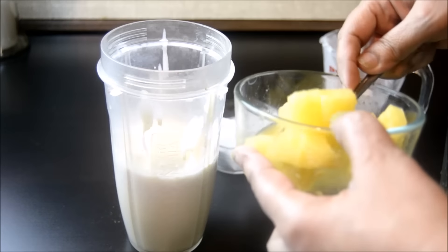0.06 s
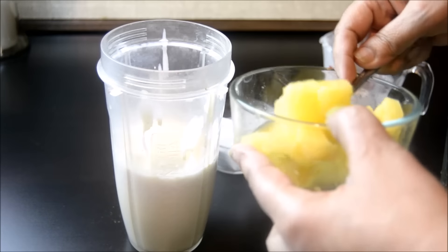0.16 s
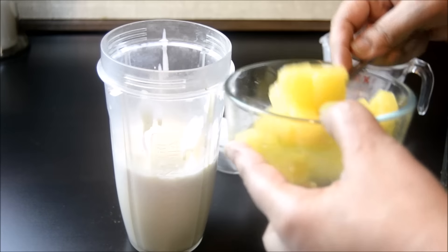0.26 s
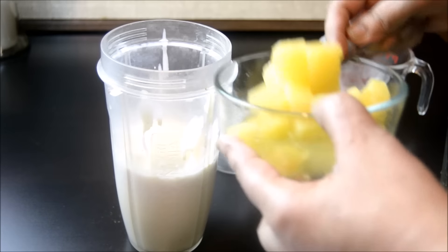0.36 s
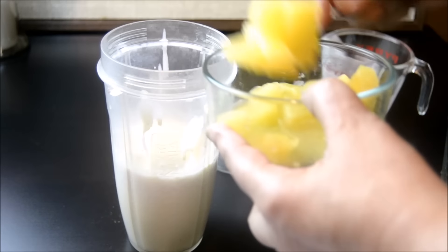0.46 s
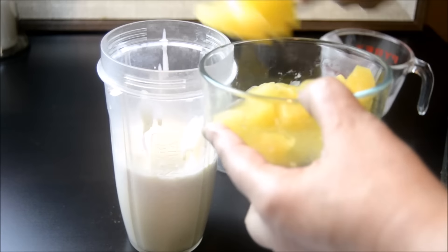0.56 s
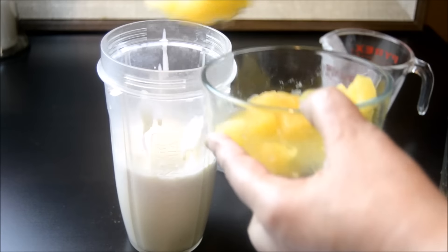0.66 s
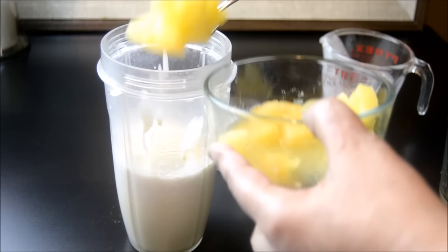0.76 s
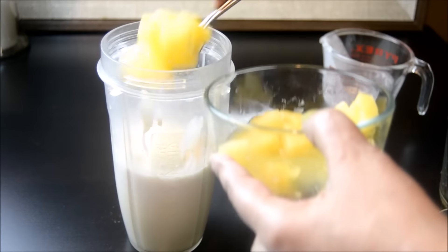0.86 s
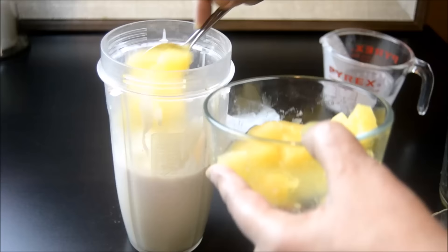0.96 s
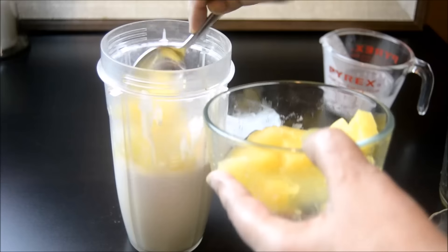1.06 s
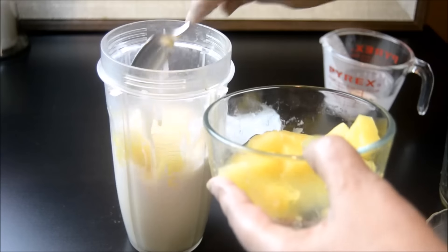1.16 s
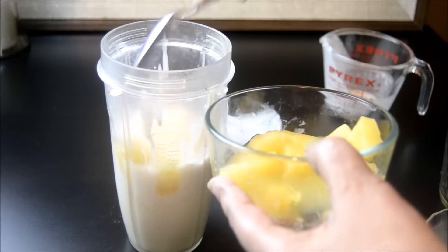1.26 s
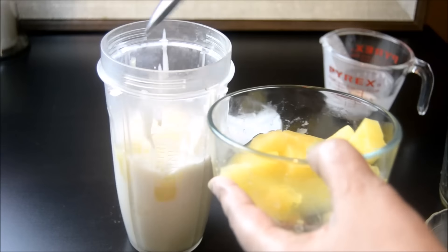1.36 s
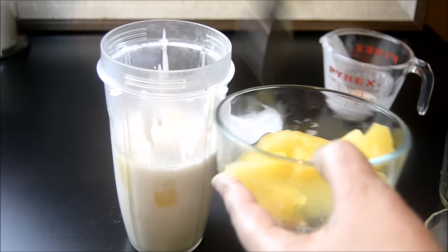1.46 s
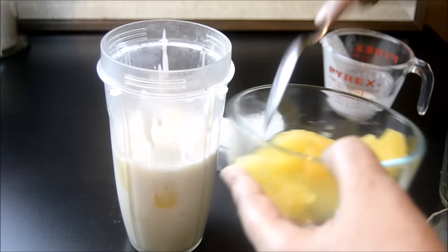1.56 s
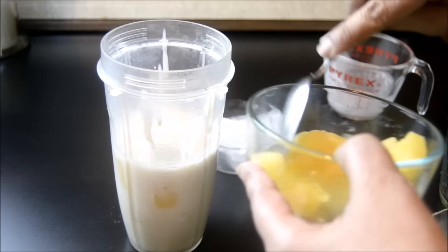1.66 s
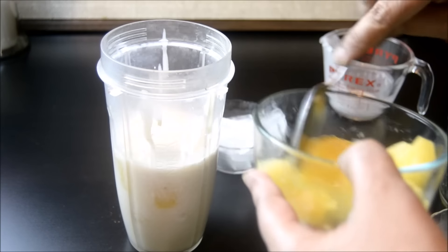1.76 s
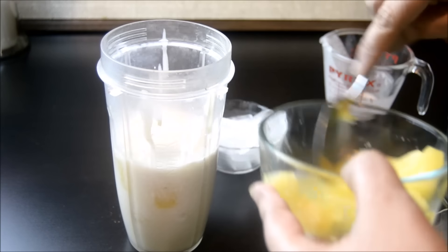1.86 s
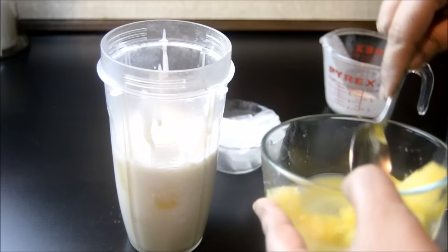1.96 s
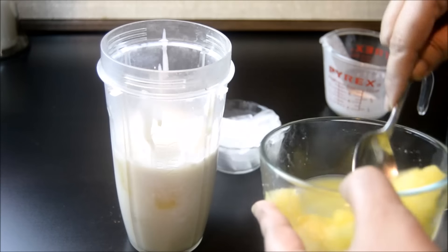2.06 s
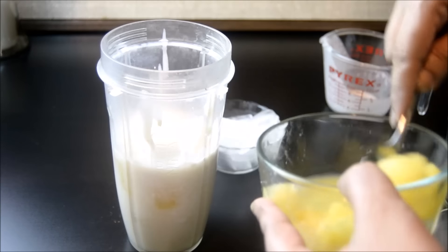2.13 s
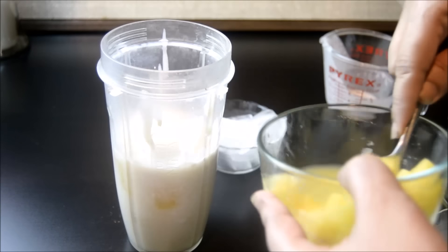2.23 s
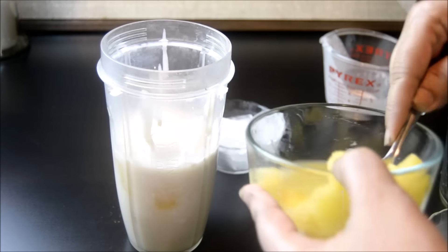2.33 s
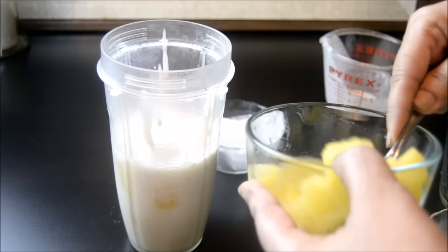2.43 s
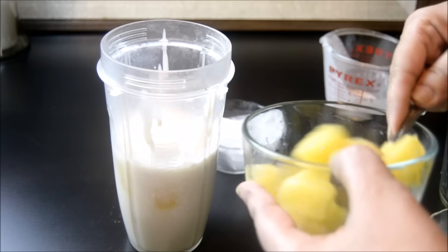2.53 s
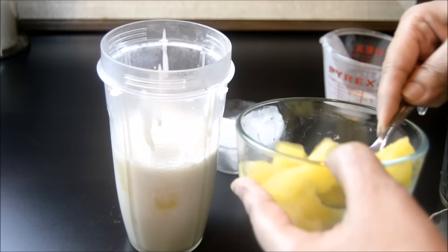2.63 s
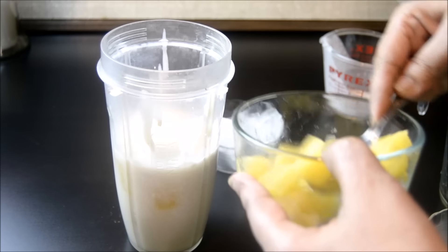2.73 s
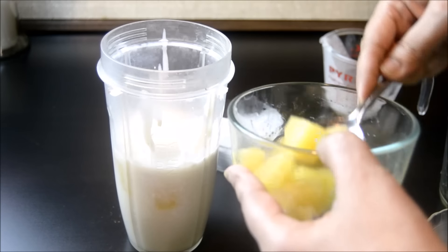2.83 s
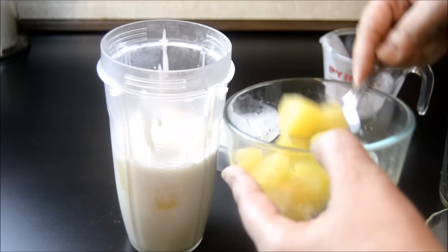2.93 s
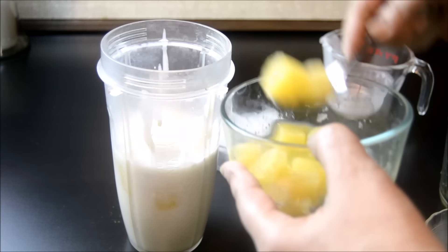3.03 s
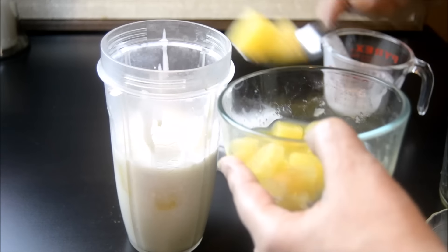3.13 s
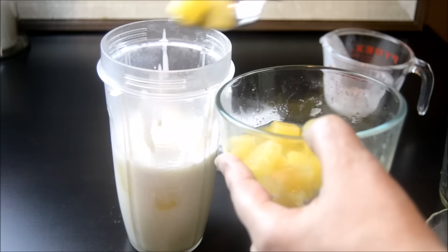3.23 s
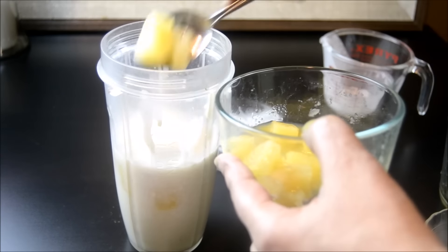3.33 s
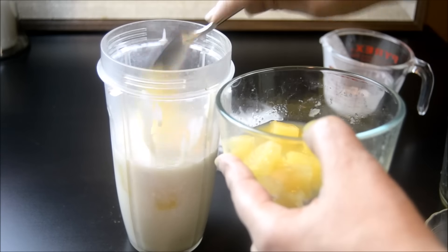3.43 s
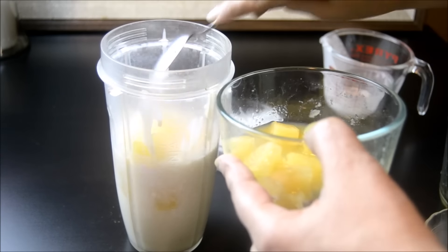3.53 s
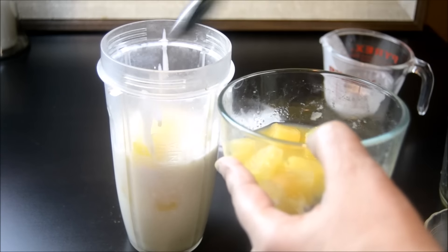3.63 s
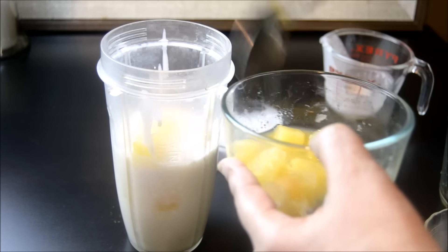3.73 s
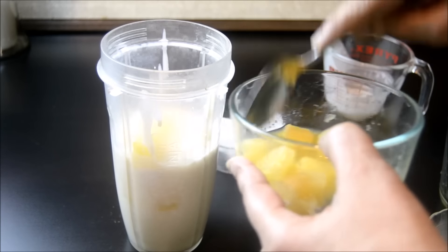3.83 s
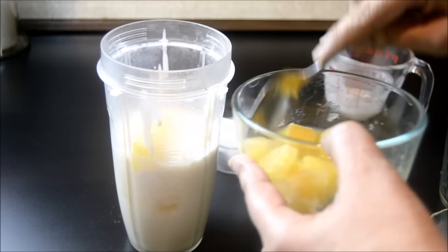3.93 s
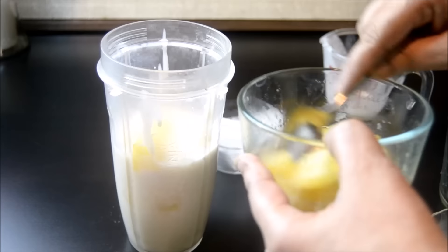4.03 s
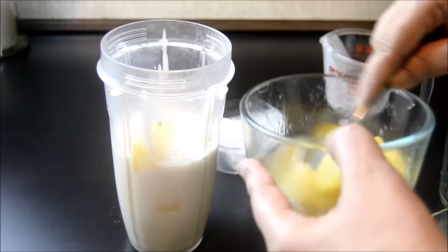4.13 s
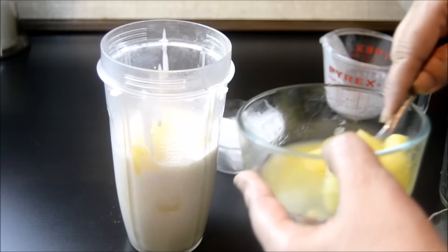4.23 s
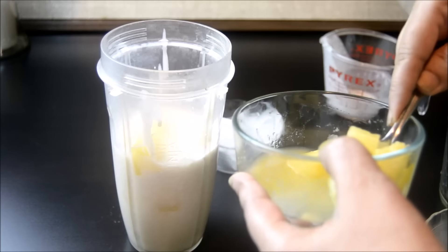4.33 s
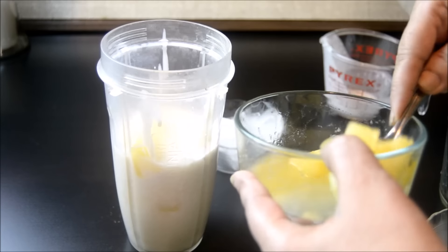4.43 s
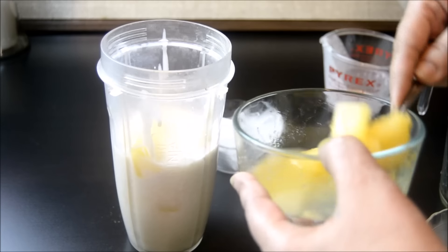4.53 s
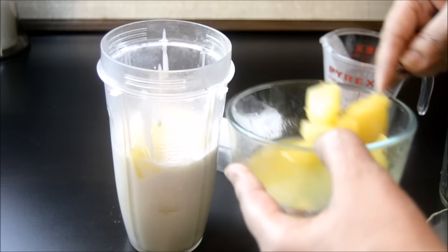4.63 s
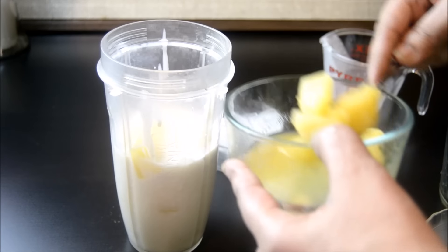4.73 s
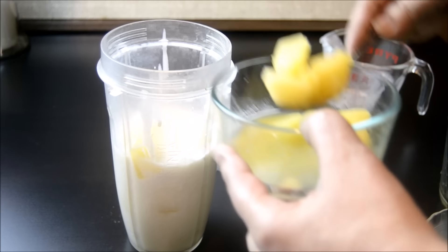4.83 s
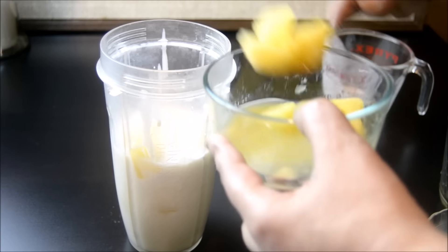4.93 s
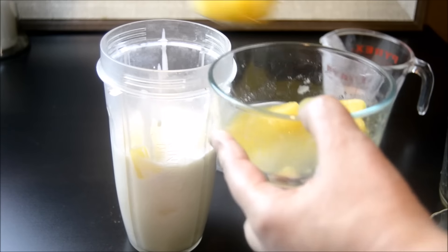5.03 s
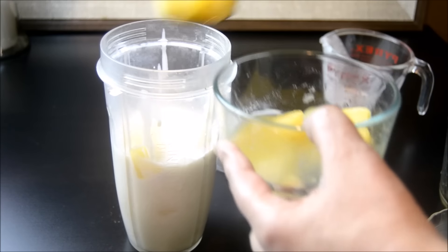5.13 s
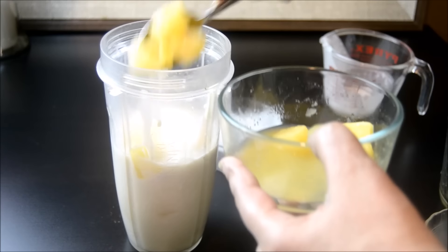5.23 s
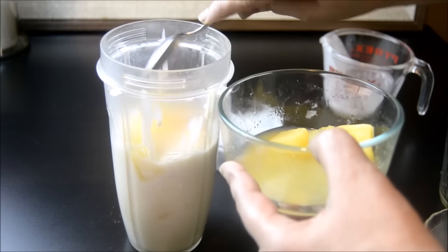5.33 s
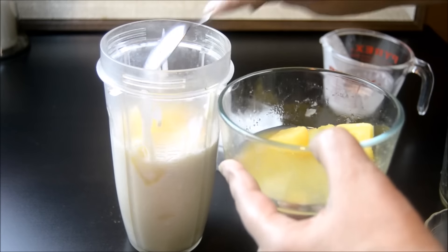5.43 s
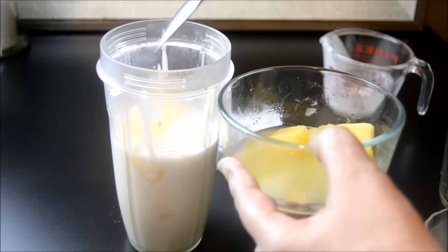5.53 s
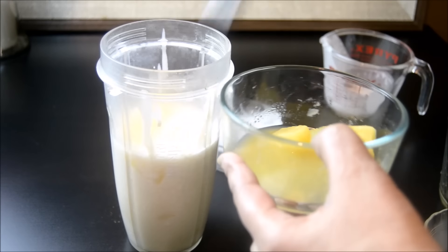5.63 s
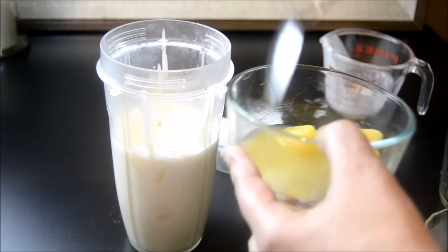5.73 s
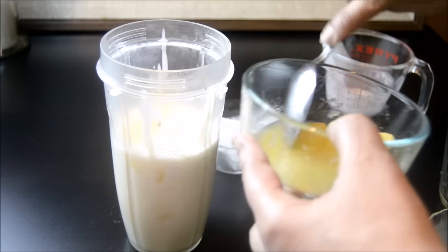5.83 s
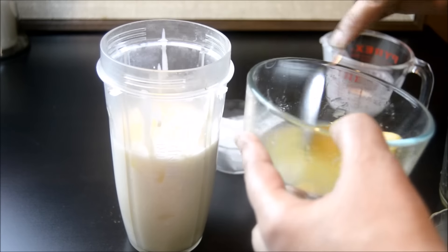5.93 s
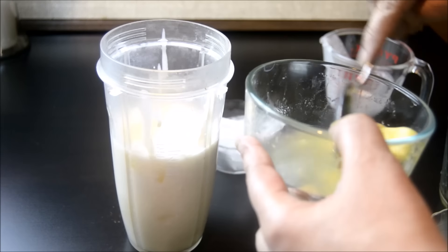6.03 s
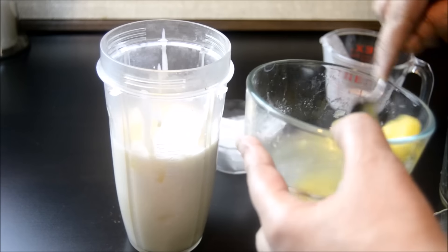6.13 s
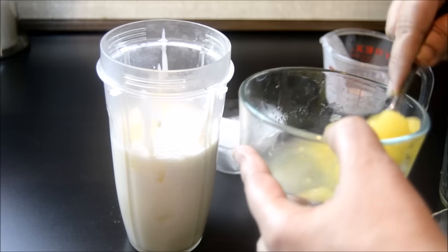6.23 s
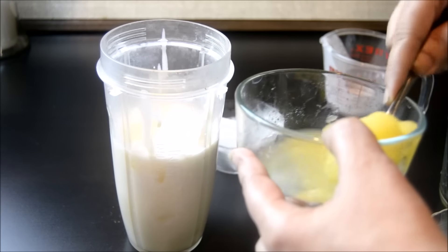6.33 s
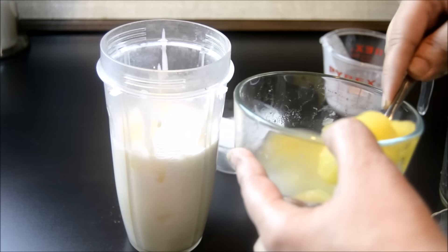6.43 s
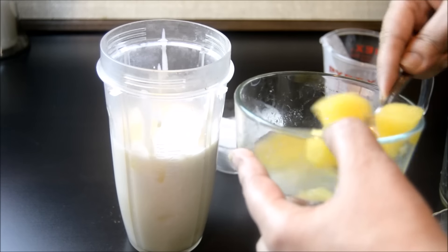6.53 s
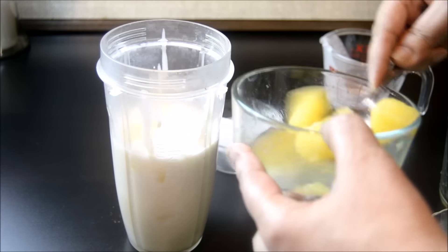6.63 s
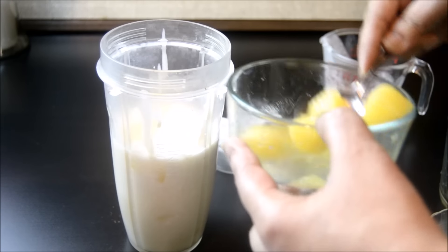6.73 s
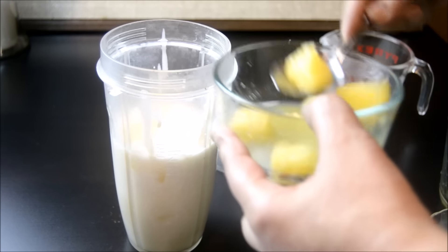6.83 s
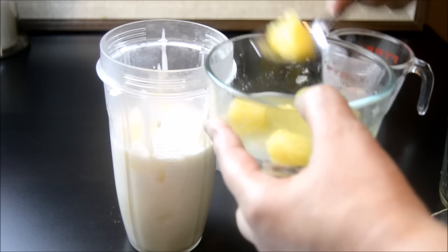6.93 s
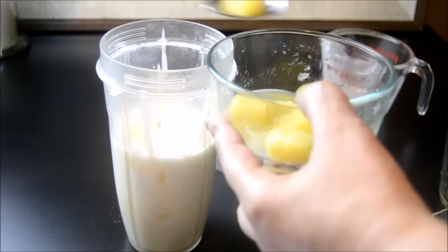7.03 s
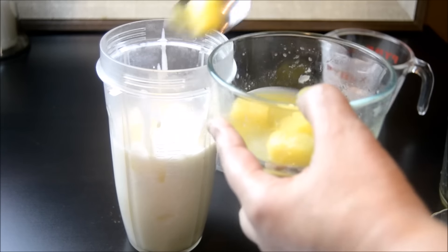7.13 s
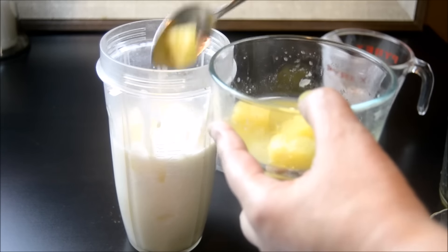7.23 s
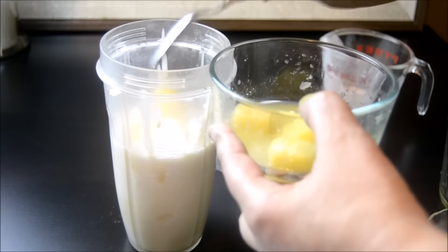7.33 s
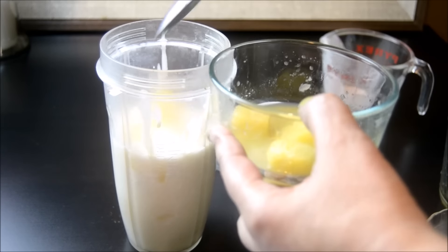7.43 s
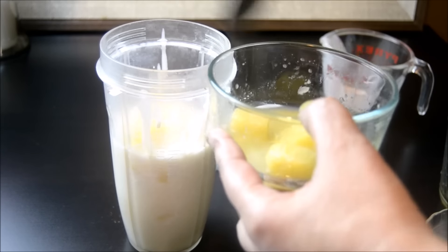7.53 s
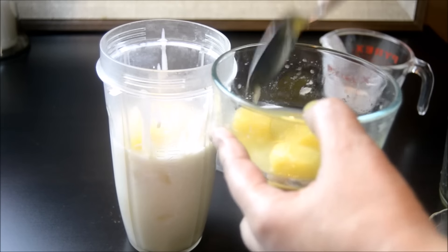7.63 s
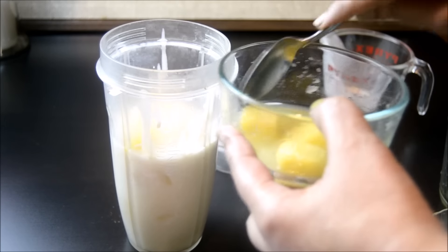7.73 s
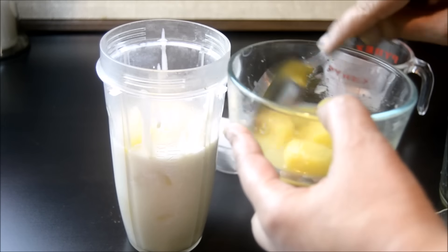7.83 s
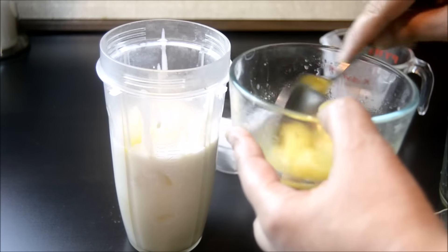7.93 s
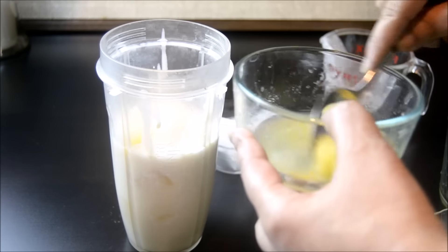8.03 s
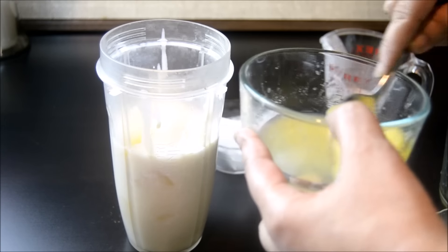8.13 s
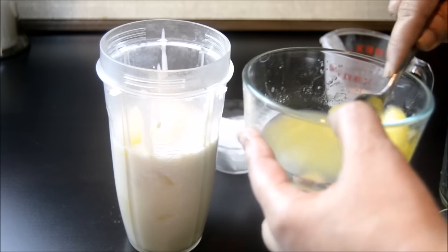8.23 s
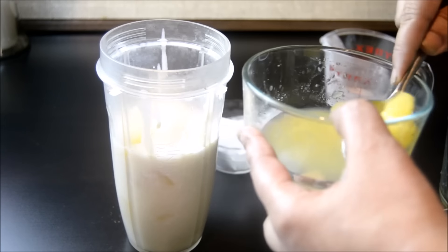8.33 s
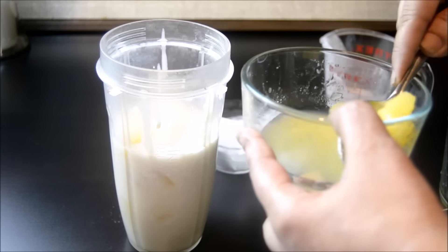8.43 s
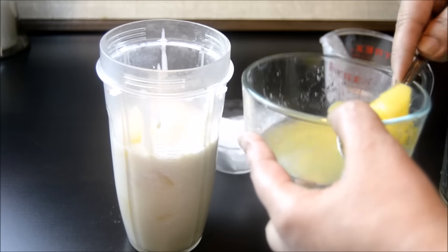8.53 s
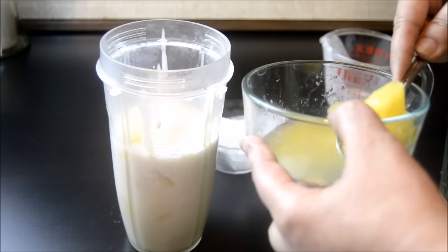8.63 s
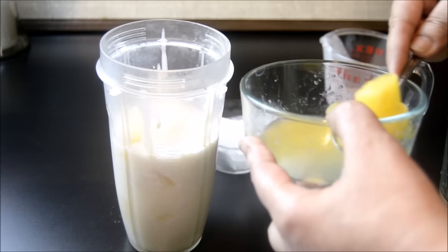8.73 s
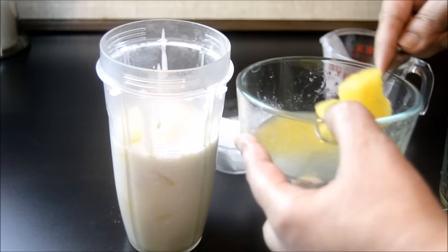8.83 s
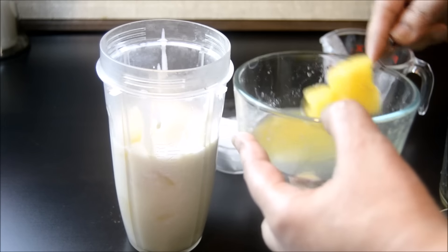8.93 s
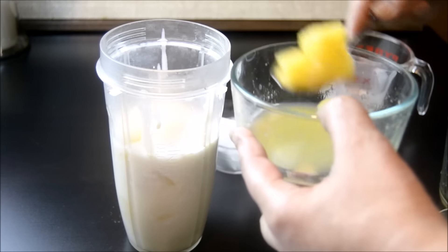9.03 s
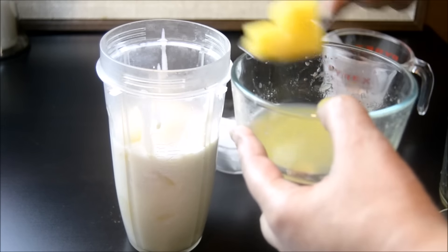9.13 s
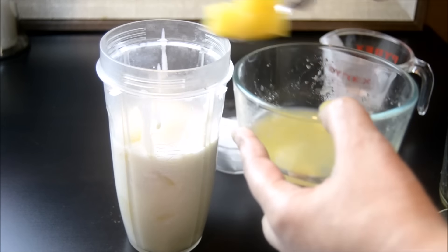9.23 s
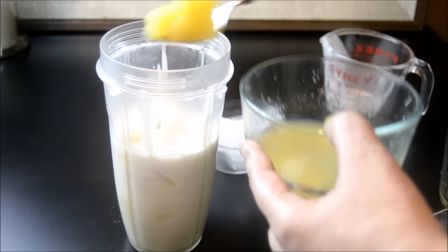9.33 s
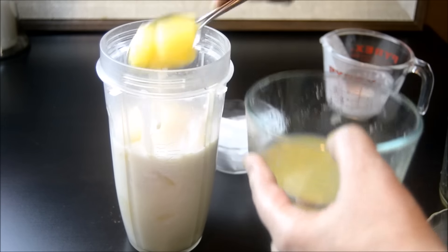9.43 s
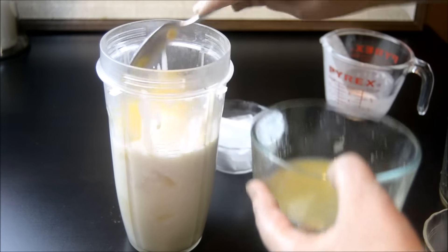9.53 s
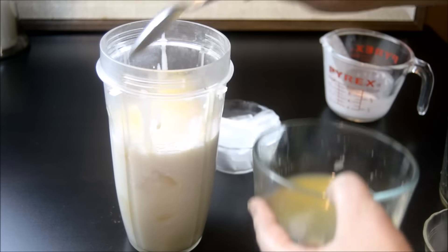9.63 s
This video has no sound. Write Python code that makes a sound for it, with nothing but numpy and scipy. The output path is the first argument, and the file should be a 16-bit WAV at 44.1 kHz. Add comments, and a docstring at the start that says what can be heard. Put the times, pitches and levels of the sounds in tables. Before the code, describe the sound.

A metal spoon clinks brightly in a hand-held glass bowl, with soft wet fruit plops into a milk-filled plastic jar over a faint kitchen hum.

```python
"""Room hush and a wavering appliance hum run throughout: coloured noise and two unsteady tones.
From 1 s fruit chunks plop into a plastic blender jar of milk (jar-air modes, spatter noise); wet fruit smacks.
From 1.6 s a steel spoon clinks in a hand-held glass bowl: damped modes of both, plus a crack of contact.
At 4.9 and 6.9 s the bowl nudges the jar (dull modes, scuff noise); more plops follow at 5.3 and 9.5 s.
A small kitchen draws out all but hush and hum, by a counter bounce and a diffuse tail."""
import sys
import numpy as np
from scipy import signal
from scipy.fft import rfft, irfft
from scipy.io import wavfile

SR = 44100
rng = np.random.default_rng(int(sys.argv[2]) if len(sys.argv) > 2 else 0)


def inscribe(sig):
    """Save sig as 16-bit PCM at rate SR to the path in sys.argv[1].

    A 1-D sig is mono; a 2-D sig holds one channel per row.
    Samples are clipped to [-1, 1] before scaling.
    """
    pcm = np.round(np.clip(np.atleast_2d(sig).T, -1, 1) * 32767)
    wavfile.write(sys.argv[1], SR, pcm.astype(np.int16))


N = 426447
TOP_HZ = 11100
PIVOT_HZ = 4000  # clink brightness tilts about this pitch
RING_T_S = np.arange(SR // 4) / SR  # time axis of one short sound

# bending modes of the spoon: [f/Hz, relative level/dB, t60/s]
SPOON_MODES = [(1311, 1.5, 0.047), (2969, 4.5, 0.046), (5155, 8, 0.033), (7790, 0, 0.05),
               (10400, -18, 0.05)]
# wall modes of the bowl: [f/Hz, relative level/dB, t60/s]
BOWL_MODES = [(998, -18.5, 0.011), (1470, -17, 0.067), (1735, -16.5, .065), (1913, -7.5, .05),
              (2169, -1.5, 0.024), (2378, -8, 0.0506), (2610, -14.5, .048), (3040, -4.5, 0.045),
              (3232, -8, .045), (3475, -6.5, 0.052), (3660, -2, 0.025), (3883, -5, .05),
              (4110, -6.5, 0.065), (4390, -7, 0.058), (4390, -10.5, 0.16), (4560, -13.5, 0.065),
              (4720, -14.5, .074), (5016, -9, 0.064), (5464, -5.5, 0.036), (5688, -9.5, 0.034),
              (5857, -5.5, 0.051), (6850, -5.5, 0.04), (6890, -7, 0.039), (7010, -7, 0.049),
              (7412, -9.5, 0.16), (8380, -13, .06), (8800, -10.5, 0.083), (9350, -2.5, 0.037),
              (9560, -6.5, .05), (9990, -14, 0.039), (10350, -6, .067), (10970, -7.5, 0.03)]


def undb(db):
    """Decibels to gain."""
    return 10 ** (np.asarray(db) / 20)


def along(hz, points_hz, values):
    """Read a curve on a log-frequency axis."""
    return np.interp(np.log(np.maximum(hz, 1)), np.log(points_hz), values)


def fade(t_s, t60_s):
    """Exponential decay, 60 dB in t60 (1 ms at least)."""
    return np.exp(-np.log(1000) * t_s / max(t60_s, 1e-3))


def unit(x):
    """Scale a short sound to the energy of 10 ms at rms 1."""
    energy = np.sum(x ** 2)
    return x / np.sqrt(energy / (SR / 100))


def noise(size, colour, tilt_db_per_octave=0):
    """Noise of rms 1 with a [f/Hz, level/dB] colour and a tilt."""
    hz = np.maximum(np.fft.rfftfreq(size, 1 / SR), 1)
    points_hz, points_db = np.transpose(colour)
    tilted_db = points_db + tilt_db_per_octave * np.log2(points_hz)
    gain = undb(along(hz, points_hz, tilted_db)) * (hz < TOP_HZ + 1000)
    x = irfft(rfft(rng.standard_normal(size)) * gain, size)
    return x / np.std(x)


def walk(rate_hz):
    """Random drift of spread 1: noise under a Gaussian low-pass."""
    gain = np.exp(-(np.fft.rfftfreq(N, 1 / SR) / rate_hz) ** 2)
    x = irfft(rfft(rng.standard_normal(N)) * gain, N)
    return x / np.std(x)


def add(track, start_s, sound):
    """Mix a sound in at its start time."""
    i = int(start_s * SR)
    track[i:i + len(sound)] += sound[:N - i]


def ring(modes, drive_db, detune=0.0018):
    """Struck modes; grip and load shift each pitch a little, and each may start up or down."""
    out = 0
    for (hz, mode_db, t60_s), drive in zip(modes, drive_db):
        shifted_hz = hz * (1 + detune * rng.standard_normal())
        wave = np.sin(2 * np.pi * shifted_hz * RING_T_S)
        polarity = rng.choice([-1, 1])
        out = out + polarity * undb(mode_db + drive) * unit(wave * fade(RING_T_S, t60_s))
    return out


def burst(colour, t60_s, tilt_db_per_octave=0, grain=0):
    """Short decaying noise; grain breaks it into 64-sample droplets of random level."""
    size = len(RING_T_S)
    steps = np.repeat(rng.standard_normal(size // 64 + 1), 64)[:size]
    droplets = np.exp(grain * steps)
    return unit(noise(size, colour, tilt_db_per_octave) * droplets * fade(RING_T_S, t60_s))


def background(hush_db=-59, waver_db=0.34):
    """Room hush, its level wavering slightly, with the unsteady hum of an appliance."""
    # room hush colour: [f/Hz, relative level/dB]
    hush_colour = [(25, -12.5), (45, -20), (70, -16.5), (95, -5.5), (145, -0.5), (230, -0.5), (310, 0),
                   (450, -1.5), (1200, -5), (2500, -14), (5000, -23.5), (9500, -32.5), (11500, -46.5)]
    # appliance hum: [f/Hz, rms level/dB, unsteadiness/0-1]
    hum_tones = [(119.6, -67.5, .05), (188.2, -69.5, 1)]
    t_s = np.arange(N) / SR
    out = undb(hush_db + waver_db * walk(rate_hz=9.2)) * noise(N, hush_colour)
    for hz, db, unsteady in hum_tones:
        # complex drift sways both level and phase
        drift = walk(rate_hz=7.6) + 1j * walk(rate_hz=4.1)
        sway = (1 - unsteady) + unsteady * drift
        tone = np.real(sway * np.exp(2j * np.pi * hz * t_s))
        out = out + undb(db) * tone / np.std(tone)
    return out


def plops():
    """Fruit or spoon lands in the jar: the air above the milk rings low and droplets spatter."""
    # landings: [t/s, air column relative level/dB, spatter relative level/dB, spatter t60/s,
    #            spatter tilt/(dB/octave)]
    landings = [(1.08, -55, -49, 0.054, 1), (1.1514, -48.5, -49, 0.12, -4), (1.2276, -47, -62, .015, -4),
                (5.3287, -51.5, -52.5, 0.022, 6), (5.3758, -52, -56.5, 0.034, -3),
                (9.457, -60, -44.5, 0.024, -6.5), (9.5254, -45, -38, 0.011, -2)]
    # air in the jar above the milk: [f/Hz, relative level/dB, t60/s]
    air_modes = [(802, -9.5, 0.04), (922, -1.5, 0.041), (1030, -5, 0.033), (1710, -7, 0.015),
                 (2240, -9, 0.016)]
    # colour of wet spatter: [f/Hz, relative level/dB]
    spatter_colour = [(300, -8), (1000, -3), (2500, 1.5), (3300, 4), (4400, 5.5), (7400, -6.5),
                      (11000, -14)]
    out = np.zeros(N)
    for start_s, air_db, spatter_db, t60_s, tilt in landings:
        add(out, start_s, ring(air_modes, [air_db] * len(air_modes), detune=0.0048))
        add(out, start_s, undb(spatter_db) * burst(spatter_colour, t60_s, tilt, grain=0.21))
    return out


def smacks():
    """Juice films snap as the chunks part: short grainy noise."""
    # wet fruit smacking on the spoon: [t/s, relative level/dB]
    snaps = [(1.095, -63), (1.202, -60), (1.9007, -60.5), (1.927, -62), (2.857, -70), (3.4645, -61.5),
             (3.509, -66.5), (6.699, -66), (6.822, -59.5), (7.157, -67), (7.904, -70)]
    # colour of a smack: [f/Hz, relative level/dB]
    snap_colour = [(1000, -30), (3000, -2.5), (4800, 3), (7500, 0), (11000, -11)]
    out = np.zeros(N)
    for start_s, db in snaps:
        add(out, start_s, undb(db) * burst(snap_colour, t60_s=0.03, grain=0.6))
    return out


def spoon_drive(db, tilt_db_per_octave, place, node_db=-11):
    """Each bending mode answers as far as it swings at the contact; near a node it barely sounds."""
    hz = np.array(SPOON_MODES)[:, 0]
    half_waves = np.arange(len(SPOON_MODES)) + 1.5
    swing = np.hypot(np.cos(np.pi * half_waves * place), undb(node_db))
    return db + tilt_db_per_octave * np.log2(hz / PIVOT_HZ) + 20 * np.log10(swing)


def bowl_drive(db, tilt_db_per_octave, antinodes_hz, antinode_db=15.5, width_octaves=0.042):
    """Each blow has its own brightness; wall modes with an antinode at the contact stand out."""
    hz = np.array(BOWL_MODES)[:, 0]
    closeness = [np.exp(-0.5 * (np.log2(hz / f_hz) / width_octaves) ** 2) for f_hz in antinodes_hz]
    near = np.max(closeness, axis=0)
    return db + tilt_db_per_octave * np.log2(hz / PIVOT_HZ) + antinode_db * near


def cushion(x, contact_ms):
    """Juice and pulp lengthen the contact; whatever swings faster than it is hardly excited."""
    edge_hz = min(1000 / contact_ms, 0.45 * SR)
    return signal.sosfilt(signal.butter(4, edge_hz, fs=SR, output="sos"), x)


def clinks(spoon_trim_db=-1.23, bowl_trim_db=0.26, crack_trim_db=2, crack_t60_s=0.02, push_s=0.00016):
    """Steel meets glass: a crack of contact, and both ring, damped by hand and fruit."""
    # spoon on glass: [t/s, contact time/ms, spoon relative level/dB, spoon tilt/(dB/octave),
    #                  contact point along spoon/0-1, bowl relative level/dB, bowl tilt/(dB/octave),
    #                  list of pitches with a wall antinode at the contact f/Hz]
    blows = [(1.629, .09, -33, 0.5, 0.13, -46, -1.5, [2500, 4800, 5850]),
             (1.8186, .13, -61.5, -2, .65, -68, -3, [1486, 4740]),
             (2.22, 0.11, -49.5, -5, 0.44, -41, 0, [980, 2050, 4170, 4268, 9900]),
             (2.339, 0.12, -43.5, 6, 0.12, -51, -2, [2160, 2610, 5400]),
             (2.495, 0.17, -50, 6, .57, -52, -1.5, [2560, 3100, 7100]),
             (2.7398, 0.13, -79, -6, .6, -76, 4.5, [4130, 8949]),
             (3.8322, 0.083, -34, 1, 0.54, -46.5, 1.5, [2660, 5200, 5570]),
             (4.001, .1, -64, -9.5, 0.6, -52.5, 1, [980, 3800, 6850]),
             (4.1797, 0.09, -56.5, -10, 0.38, -51.5, -1, [1486, 4220, 5800]),
             (4.263, 0.11, -50, 2, 0.34, -44, -2.5, [2300, 2560, 3320]),
             (5.821, 0.076, -36, -2, 0.77, -52, -1, [1738, 8949]),
             (5.832, 0.11, -39, -10, .29, -37.5, -1, [980, 4150, 4340, 6917, 10383]),
             (6.071, 0.15, -43.5, -1, .43, -48.5, -4, [3050, 5750, 9840]),
             (6.255, 0.13, -34.5, 2, .44, -34.5, 1, [1783, 3146, 3970, 4530, 5170, 10740]),
             (7.703, 0.1, -33.5, 1, .53, -48, 2.5, [1738, 5500, 8400]),
             (7.786, .14, -61, -4, 0.2, -58, 6.5, [1486, 4740]),
             (7.971, 0.15, -57, -3, 0.29, -56.5, 1.5, [2100, 3023, 7370]),
             (8.227, 0.17, -73, -10, 0.4, -71.5, -0.5, [2160, 3232]),
             (8.267, 0.16, -38.5, 0, 0.9, -39.5, 1.5, [3970, 4480, 5460, 5610, 8949]),
             (8.303, 0.22, -49.5, -1, 0.74, -49, 0.5, [3023, 5580])]
    # colour of the crack of contact: [f/Hz, relative level/dB]
    crack_colour = [(300, -17.5), (700, -11.5), (1100, -4), (2200, 0.5), (3300, 6), (4200, -1.5),
                    (5600, 3.5), (7000, 3.5), (9500, -9), (11100, -7)]
    out = np.zeros(N)
    push = 1 - np.exp(-RING_T_S / push_s)  # soft onset
    for start_s, contact_ms, steel_db, steel_tilt, place, glass_db, glass_tilt, antinodes_hz in blows:
        spoon = ring(SPOON_MODES, spoon_drive(spoon_trim_db + steel_db, steel_tilt, place))
        bowl = ring(BOWL_MODES, bowl_drive(bowl_trim_db + glass_db, glass_tilt, antinodes_hz))
        crack = undb(crack_trim_db + glass_db) * burst(crack_colour, crack_t60_s, glass_tilt)
        add(out, start_s, cushion(push * (spoon + bowl + crack), contact_ms))
    return out


def nudges(scuff_trim_db=-3):
    """Glass against plastic: a dull knock of struck modes with a short scuff."""
    # bowl nudges jar: [t/s, relative level/dB, tilt/(dB/octave)]
    knocks = [(4.8805, -45, -0.5), (6.9038, -44, -3.5)]
    # jar wall, bowl and the spoon lying in it: [f/Hz, relative level/dB, t60/s]
    knock_modes = [(306, -11.5, 0.26), (372, -10, 0.042), (418, -2, 0.093), (715, -11, 0.07),
                   (942, -9.5, 0.091), (1321, -1, 0.42), (2390, -11, 0.087), (2970, -4, 0.15),
                   (4000, -15, 0.044)]
    scuff_colour = [(300, 2.5), (2500, -5), (5000, -12), (10000, -39)]  # f/Hz, relative level/dB
    out = np.zeros(N)
    octaves = np.log2(np.array(knock_modes)[:, 0] / knock_modes[0][0])
    for start_s, db, tilt in knocks:
        scuff = burst(scuff_colour, t60_s=0.024, grain=0.18)
        add(out, start_s, ring(knock_modes, db + tilt * octaves))
        add(out, start_s, undb(db + scuff_trim_db) * scuff)
    return out


def radiate(x, edge_hz=260):
    """Small bodies radiate little bass: high-pass."""
    return signal.sosfilt(signal.butter(2, edge_hz, "high", fs=SR, output="sos"), x)


def kitchen(x, counter_s=0.0034, counter_db=-6, build_s=0.0052):
    """Direct sound, a bounce off the counter, and a diffuse tail with its own decay per band."""
    # reverberation bands: [f/Hz, t60/s, relative level/dB]
    bands = [(400, 0.12, -6), (1500, 0.36, -1), (3930, 0.43, -3), (6500, 0.4, -6), (10900, 0.29, -2.5)]
    t_s = np.arange(int(0.6 * SR)) / SR
    size = len(t_s)
    hz = np.fft.rfftfreq(size, 1 / SR)
    bands_hz = [row[0] for row in bands]
    scatter = rfft(rng.standard_normal(size))
    response = np.zeros(size)
    # each row of the identity makes one band, cross-faded into its neighbours
    for share, (_, t60_s, db) in zip(np.eye(len(bands)), bands):
        envelope = fade(t_s, t60_s) * (1 - np.exp(-t_s / build_s))
        band = irfft(scatter * along(hz, bands_hz, share), size)
        response += undb(db) * band * envelope / np.linalg.norm(envelope)
    response[0] += 1  # direct sound
    # clutter on the counter smears its bounce
    bounce = rng.standard_normal(size) * fade(t_s, t60_s=0.0016)
    delay = int(counter_s * SR)
    response[delay:] += undb(counter_db) * bounce[:size - delay] / np.linalg.norm(bounce)
    return signal.fftconvolve(x, response)[:N]


def scene():
    """Handling sounds in the kitchen over the background."""
    handling = undb(-3.5) * plops() + undb(-5) * smacks() + undb(2) * clinks() + undb(-0.5) * nudges()
    return (kitchen(radiate(handling)) + background())[None]


def record(dry):
    """Steep elliptic low-pass at TOP_HZ."""
    return signal.sosfilt(signal.ellip(8, 0.2, 60, TOP_HZ, fs=SR, output="sos"), dry)


dry = scene()
out = record(dry)
inscribe(out)
```